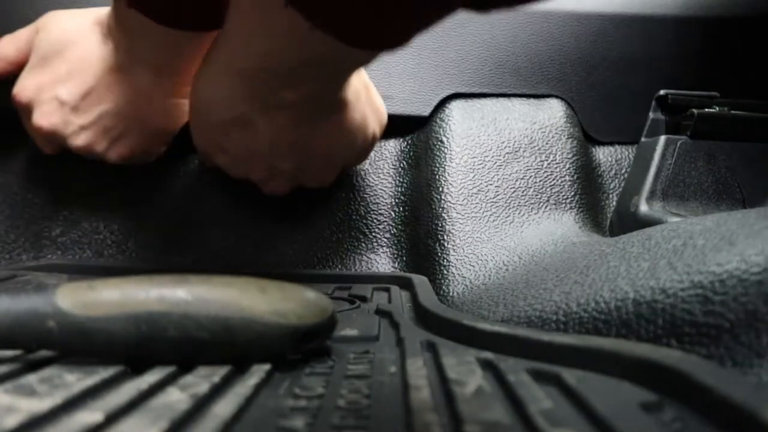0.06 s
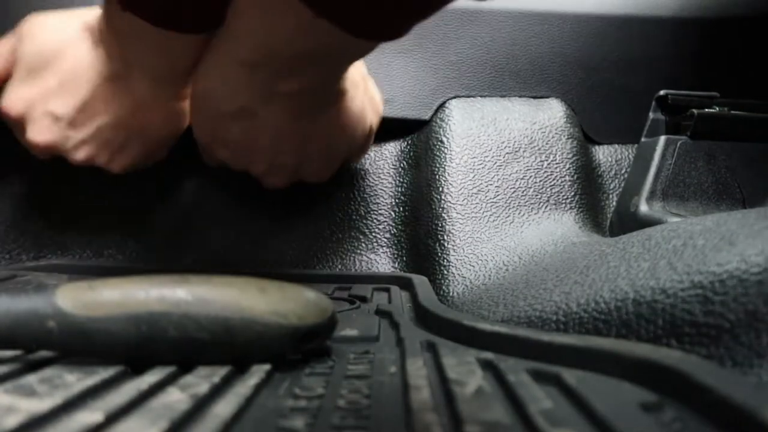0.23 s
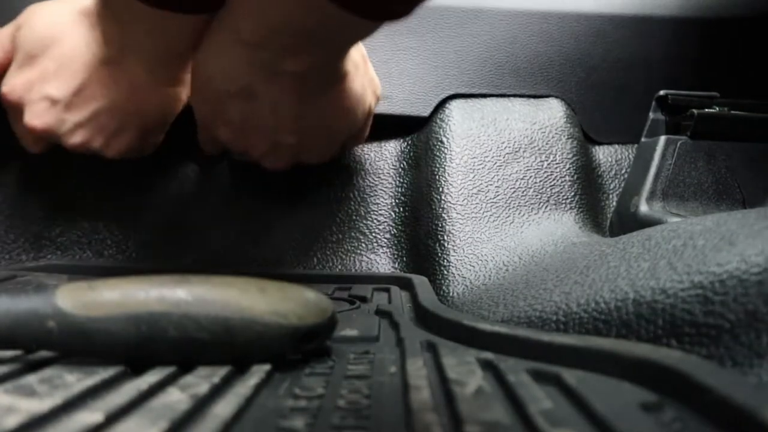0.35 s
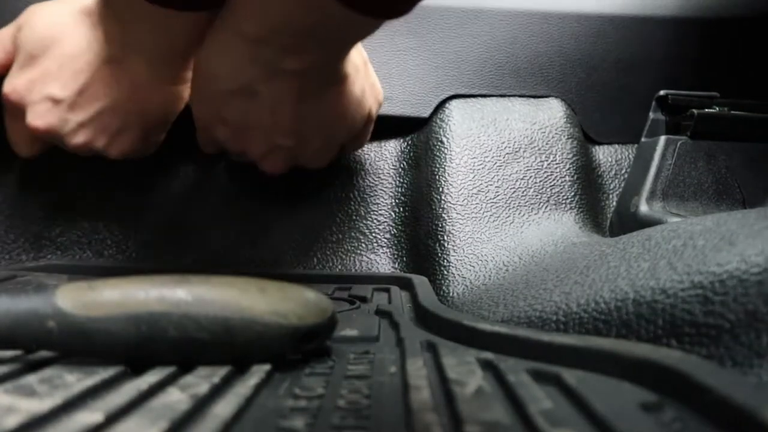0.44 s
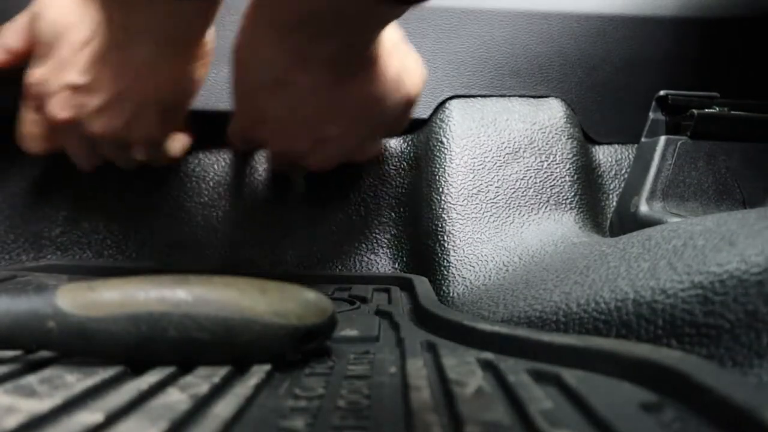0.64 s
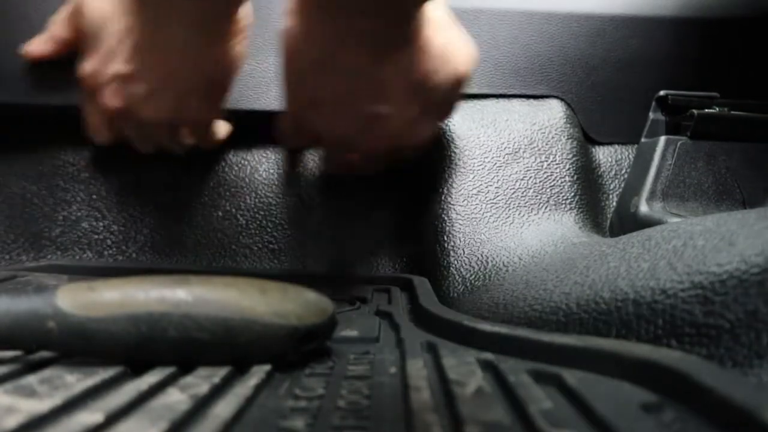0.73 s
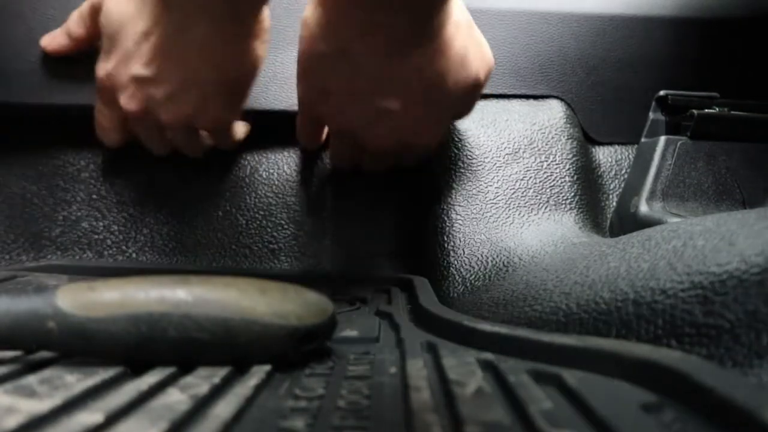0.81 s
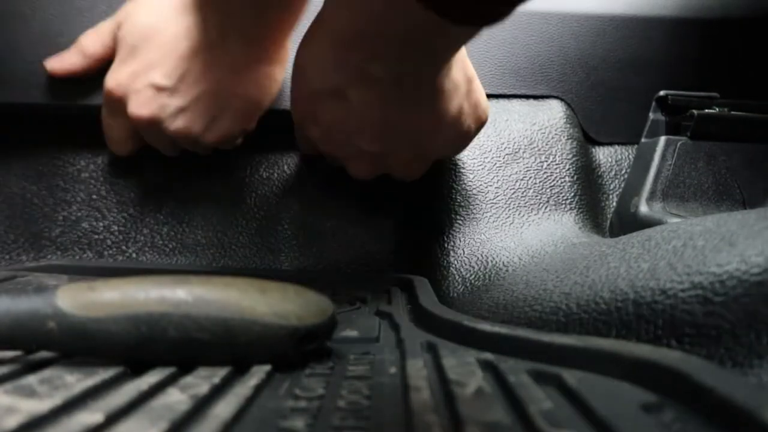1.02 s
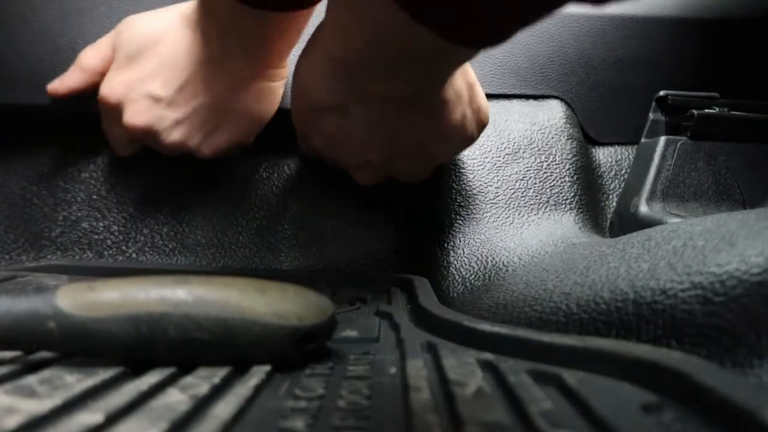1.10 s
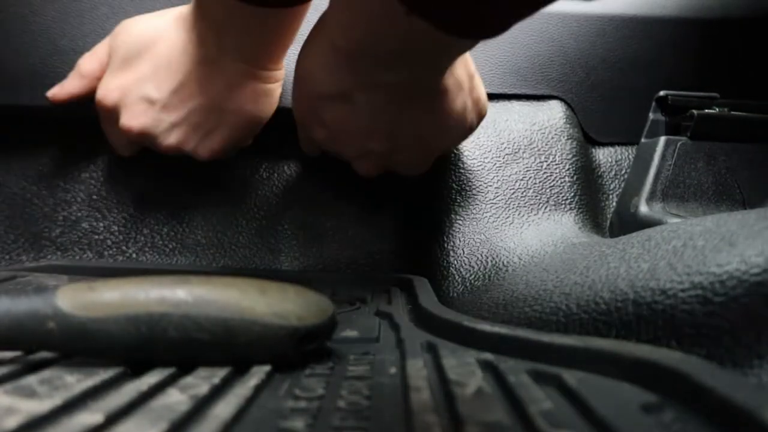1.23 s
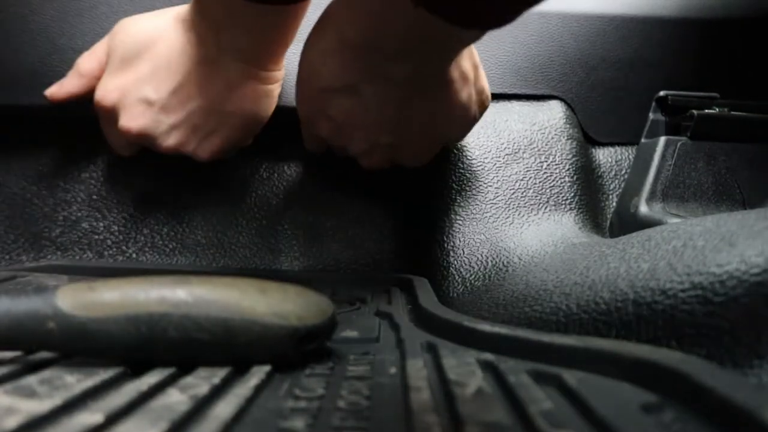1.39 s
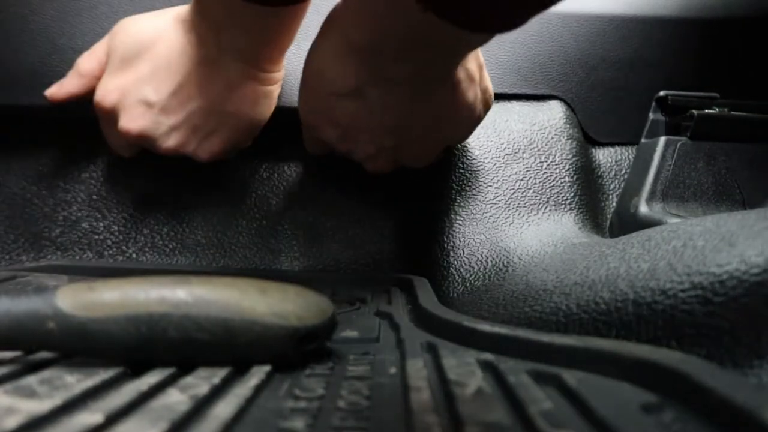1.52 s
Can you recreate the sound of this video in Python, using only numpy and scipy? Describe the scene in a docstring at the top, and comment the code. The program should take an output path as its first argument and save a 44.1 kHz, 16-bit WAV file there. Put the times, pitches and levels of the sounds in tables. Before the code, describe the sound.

A plastic clip snaps loose with one loud crack as hands pry at a trim panel. Much softer knocks, clicks, rubbing and faint squeaks follow, heard close up inside a quiet vehicle cab.

```python
"""A push-pin clip snaps loose as a plastic trim panel is pried off by hand in a vehicle cab, close-miked.
The snap is a crack of resonant noise, ringing panel modes, a deep push of air and a shaking cab; it overloads.
The panel chatters and fingers knock on it: short scuffs of resonant noise that die away as thuds and clicks.
Strained plastic squeaks in gliding harmonics, and hands and sleeves slide as strokes of grainy noise.
A hand leans on the panel with one deep decaying sine, over the low noise of the quiet cab."""
import sys
import numpy as np
from scipy import signal
from scipy.fft import rfft, irfft
from scipy.io import wavfile
from scipy.ndimage import uniform_filter1d

SR = 44100
rng = np.random.default_rng(int(sys.argv[2]) if len(sys.argv) > 2 else 0)


def generate_wav(signal):
    """Clip the signal to [-1, 1] and save it as 16-bit WAV at the path in sys.argv[1]."""
    frames = np.transpose(np.atleast_2d(signal))
    scaled = np.clip(frames, -1, 1) * 32767
    pcm = np.round(scaled).astype(np.int16)
    wavfile.write(sys.argv[1], SR, pcm)


N = 68355  # length in samples

# quiet cab noise, relative spectrum: pitch_hz [Hz], density_db [dB per Hz]
FLOOR_SPECTRUM = [(25, -9), (60, 1), (200, -6), (400, -15), (800, -22), (1350, -18), (2000, -28),
                  (4000, -35), (15000, -45.5)]
# hand and sleeve strokes: start_s [s], peak_s [s], end_s [s], rub_db [dB before grain], hiss_db [dB before grain]
SLIDE_STROKES = [(-.1, 0.038, 0.073, -57, -66), (0.027, 0.097, 0.28, -58, -72),
                 (0.257, 0.367, 0.4, -53.5, -76.5), (0.505, 0.624, 0.78, -53.5, -60),
                 (0.656, 0.744, .83, -47.5, -55), (.72, .83, 0.99, -60.5, -72.5),
                 (0.882, 0.97, 1.08, -60, -63), (0.998, 1.067, 1.288, -60, -71),
                 (1.143, 1.276, 1.365, -59, -74.5), (1.384, 1.408, 1.44, -63.5, -75),
                 (1.44, 1.52, 1.54, -58.5, -73)]
# rubbing on plastic, relative spectrum before softening: pitch_hz [Hz], density_db [dB per Hz]
RUB_SPECTRUM = [(59, -42.5), (100, -12.5), (558, -1), (674, -9.5), (904, -5), (1560, -9), (2320, -10.5),
                (2750, -12), (5480, -16), (15000, -31.5)]
# hiss of the strokes, relative spectrum: pitch_hz [Hz], density_db [dB per Hz]
HISS_SPECTRUM = [(1500, -11.5), (3500, 1.5), (6000, 0.5), (8500, -5.5), (11000, -8), (15000, -7)]
# squeaks of strained plastic and fingertips:
# start_s [s], length_s [s], pitch_hz [Hz, before glide and waver], level_db [dB], overtone_db [dB per overtone]
SQUEAK_EVENTS = [(.02, 0.04, 2645, -57, -9), (0.86, 0.06, 1430, -59, -18), (1.047, 0.034, 1334, -59, -9.5)]
# knocks and chatters of the panel: start_s [s], contact_s [s], thud_db [dB before body band],
# knock_db [dB before body band], knock_hz [Hz], click_db [dB], tick_db [dB]
KNOCK_EVENTS = [(0.099, 0.0013, -41.5, -40, 780, -64, -94), (0.106, 0.0013, -42.5, -43.5, 696, -63.5, -76),
                (0.136, 0.0026, -40, -57, 650, -80, -81), (0.167, 0.025, -55, -56.5, 509, -85, -73),
                (.194, 0.012, -36.5, -54, 600, -54.5, -63), (.298, 0.0013, -53.5, -91, 892, -52, -56),
                (.335, .010, -46, -37, 980, -47.5, -53.5), (.362, 0.0053, -40.5, -42.5, 578, -53, -61),
                (0.5157, .002, -52.5, -42, 503, -63, -81.5), (.564, 0.0029, -39.5, -43, 850, -38, -48),
                (0.592, 0.017, -49, -47.5, 603, -61, -77), (0.657, 0.00099, -49.5, -44.5, 633, -56.5, -50),
                (0.7522, 0.0016, -33.5, -31, 460, -47, -51), (0.846, 0.0067, -56, -47, 557, -65.5, -78),
                (1.024, 0.012, -59, -50, 558, -65.5, -73.5), (1.1944, 0.0012, -37, -37, 1060, -42.5, -49.5),
                (1.26, 0.0085, -45, -49.5, 494, -60, -69.5), (1.292, 0.0013, -50, -34.5, 574, -47.5, -56),
                (1.358, 0.0027, -53.5, -48, 594, -60.5, -89), (1.459, .001, -80, -59.5, 1714, -58, -76),
                (1.474, 0.0083, -61, -56, 521, -62, -79), (1.516, 0.0069, -68, -57, 1343, -58.5, -73)]
# crack of the pin and its tail in the cab, levels before CRACK_DB:
# pitch_hz [Hz], crack_db [dB], crack_t60_s [s], tail_db [dB], tail_t60_s [s]
CRACK_BANDS = [(62.5, -23, 0.022, -45.5, 0.17), (216, -16.5, 0.039, -45.5, 0.68),
               (638.8, -9.5, 0.026, -43, 0.13), (1560, -6, 0.04, -42, 0.12), (3020, -5, 0.02, -41.5, 0.15),
               (6100, -8.5, .031, -42.5, 0.051), (14000, -25, 0.021, -47.5, .075)]
# ringing panel modes: pitch_hz [Hz], level_db [dB before RING_DB]
PANEL_MODES = [(120, -26.5), (226, -9), (297, -3.5), (472, -1.5), (560, -7.5), (655, -3), (875, -9.5),
               (1012, -6.5), (1090, -6.5), (1303, -3), (1697, -11), (1980, -7), (2160, -3), (2510, -1.5)]
# cab body modes: pitch_hz [Hz], level_db [dB before SHAKE_DB], t60_s [s]
SHAKE_MODES = [(54, -10, 0.57), (72, -11.5, .4), (97.4, -2.5, .42)]

FLOOR_DB = -61.5
RUB_SOFT_HZ, GRAIN_DB, GRAIN_PER_S = 2500, 2, 490
SQUEAK_GLIDE, SQUEAK_WAVER, WAVER_PER_S = 0.06, 0.065, 1300  # glide and waver are shares of the pitch
BUMP_S, BUMP_HZ, BUMP_T60_S, BUMP_DB = 1.4, 56.4, 0.059, -43.5

THUD_HZ, THUD_WIDTH_HZ, THUD_T60_S = 230, 180, 0.062
CLICK_HZ, CLICK_WIDTH_HZ, CLICK_T60_S = 2600, 710, 0.013
TICK_HZ, TICK_WIDTH_HZ, TICK_T60_S = 5000, 3500, 0.0057
KNOCK_SHARE, KNOCK_CYCLES = 0.25, 22  # width as a share of the pitch; periods until a knock has died away
CLACK_HZ, CLACK_WIDTH_HZ, CLACK_DB = 850, 530, -6  # broad clack around each knock, dB relative to it
CAB_T60_S, CAB_DB = 0.16, -30  # slower tail under each contact
BODY_ATTACK_S, CLICK_ATTACK_S = 0.0011, 0.00023
BODY_LOW_HZ, BODY_HIGH_HZ = 111, 2350  # range in which a light contact moves the panel

SNAP_S, RING_DB, CRACK_DB, SHAKE_DB = 0.2049, 6, 8, -28.5
RING_BUILD_S, CRACK_BUILD_S = 0.0017, 0.0002
PANEL_T60_S, PANEL_REF_HZ, PANEL_DAMPING = 0.062, 300, 0.3  # t60 at the reference pitch; exponent of its fall
PUSH_HZ, PUSH_T60_S, PUSH_DB = 46, 0.02, -4  # air shoved by the jumping panel
FULL_SCALE, TOP_HZ = 0.98, 15500  # clipping level; upper edge of the recorder


def undb(db):
    """Decibels to gain."""
    return 10 ** (np.asarray(db) / 20)


def unit(x):
    """Scale to rms 1."""
    return x / np.sqrt(np.mean(x ** 2))


def since(at):
    """Seconds since a moment, zero before it."""
    return np.maximum(np.arange(N) / SR - at, 0)


def fade(t, t60):
    """Exponential decay, falling 60 dB in t60 seconds."""
    return np.exp(-np.log(1000) * t / t60)


def rise(t, attack):
    """Exponential attack."""
    return 1 - np.exp(-t / attack)


def shaped(gain):
    """Noise of rms 1 with a gain for every frequency."""
    freqs = np.arange(N // 2 + 1) * SR / N + 1e-3  # offset avoids zero
    spectrum = rfft(rng.standard_normal(N))
    return unit(irfft(spectrum * gain(freqs), N))


def coloured(points):
    """Noise with a spectrum of (Hz, dB) points, joined on a logarithmic pitch scale."""
    hz, db = np.array(points).T
    return shaped(lambda f: undb(np.interp(np.log(f), np.log(hz), db)))


def resonant(hz, width):
    """Noise in a steep resonance, its slow swells evened out so that each blow keeps its strength."""
    x = shaped(lambda f: 1 / (1 + ((f * f - hz * hz) / (f * width)) ** 2))
    power = np.abs(signal.hilbert(x)) ** 2
    swells = uniform_filter1d(power, size=int(SR / width) + 1)
    return unit(x / np.sqrt(swells))


def modes(table, t):
    """Decaying sines, each slightly off its pitch."""
    out = 0
    for hz, db, t60 in table:
        detuned_hz = hz * (1 + 0.002 * rng.standard_normal())
        out = out + undb(db) * fade(t, t60) * np.sin(2 * np.pi * detuned_hz * t)
    return out


def wobble(rate):
    """Random values, rate per second, joined by lines and spread near 1."""
    return np.interp(np.arange(N) * rate / SR, np.arange(N), rng.standard_normal(N))


def quiet_cab():
    """Steady low-heavy noise of the cab."""
    return undb(FLOOR_DB) * coloured(FLOOR_SPECTRUM)


def slides():
    """Skin and cloth rub over the grained plastic in strokes that swell and fade."""
    t, out = np.arange(N) / SR, 0
    soften = signal.butter(1, RUB_SOFT_HZ, fs=SR, output="sos")
    rub = unit(signal.sosfilt(soften, coloured(RUB_SPECTRUM)))
    hiss = coloured(HISS_SPECTRUM)
    for start, peak, end, rub_db, hiss_db in SLIDE_STROKES:
        ramp = np.interp(t, [start, peak, end], [0, 1, 0])
        stroke = np.sin(np.pi / 2 * ramp) ** 2
        out = out + stroke * (undb(rub_db) * rub + undb(hiss_db) * hiss)
    grain = undb(GRAIN_DB * wobble(GRAIN_PER_S))
    return out * grain


def bump():
    """A hand leans on the panel: a soft, deep bump as the grip settles."""
    return modes([(BUMP_HZ, BUMP_DB, BUMP_T60_S)], since(BUMP_S))


def squeaks():
    """Plastic sticks and slips at a high, unsteady rate that rises a little."""
    out = 0
    for start, length, hz, db, overtone_db in SQUEAK_EVENTS:
        progress = np.minimum(since(start) / length, 1)
        swell = np.sqrt(4 * progress * (1 - progress))
        bend = SQUEAK_GLIDE * (progress - 0.5) + SQUEAK_WAVER * wobble(WAVER_PER_S)
        phase = 2 * np.pi * np.cumsum(hz * (1 + bend)) / SR
        harmonics = sum(undb(overtone_db * k) * np.sin((k + 1) * phase) for k in range(5))
        out = out + undb(db) * swell * harmonics
    return out


def knocks():
    """Each contact scuffs briefly, then dies away as a dull thud and hollow knock under a quicker, bright click."""
    body, bright = np.zeros(N), np.zeros(N)
    thud, clack = resonant(THUD_HZ, THUD_WIDTH_HZ), resonant(CLACK_HZ, CLACK_WIDTH_HZ)
    click, tick = resonant(CLICK_HZ, CLICK_WIDTH_HZ), resonant(TICK_HZ, TICK_WIDTH_HZ)
    for start, contact, thud_db, knock_db, hz, click_db, tick_db in KNOCK_EVENTS:
        t, after = since(start), since(start + contact)
        cab_tail = undb(CAB_DB) * fade(after, CAB_T60_S)
        knock = resonant(hz, KNOCK_SHARE * hz) + undb(CLACK_DB) * clack
        # full strength lasts while the contact lasts
        low = undb(thud_db) * thud * (fade(after, THUD_T60_S) + cab_tail)
        low = low + undb(knock_db) * knock * (fade(after, KNOCK_CYCLES / hz) + cab_tail)
        high = undb(click_db) * click * (fade(after, CLICK_T60_S) + cab_tail)
        high = high + undb(tick_db) * tick * (fade(after, TICK_T60_S) + cab_tail)
        body += rise(t, BODY_ATTACK_S) * low
        bright += rise(t, CLICK_ATTACK_S) * high
    body_band = signal.butter(2, [BODY_LOW_HZ, BODY_HIGH_HZ], "band", fs=SR, output="sos")
    return bright + signal.sosfilt(body_band, body)


def pin_crack(t):
    """The pin cracks out of its hole: bands of resonant noise, each with a short tail in the cab."""
    columns = np.array(CRACK_BANDS).T
    crack = 0
    for hz in np.geomspace(60, 14000, 13):
        db, t60, tail_db, tail_t60 = (np.interp(np.log(hz), np.log(columns[0]), col) for col in columns[1:])
        decay = undb(db) * fade(t, t60) + undb(tail_db) * fade(t, tail_t60)
        crack = crack + resonant(hz, hz / 2) * decay
    return undb(CRACK_DB) * crack * rise(t, CRACK_BUILD_S)


def panel_ring(t):
    """The freed panel rings in its modes; the higher ones die sooner."""
    damped = [(hz, db, PANEL_T60_S * (PANEL_REF_HZ / hz) ** PANEL_DAMPING) for hz, db in PANEL_MODES]
    return undb(RING_DB) * modes(damped, t) * rise(t, RING_BUILD_S)


def snap():
    """The pin cracks out, the panel jumps and rings, and the cab body shakes."""
    t = since(SNAP_S)
    push = modes([(PUSH_HZ, PUSH_DB, PUSH_T60_S)], t)
    shake = undb(SHAKE_DB) * modes(SHAKE_MODES, t)
    return pin_crack(t) + panel_ring(t) - push + shake


def scene():
    """All the sounds over the quiet cab."""
    return (quiet_cab() + slides() + bump() + squeaks() + knocks() + snap())[None]


def record(dry):
    """The recorder clips the peaks flat, then cuts the top."""
    clipped = np.clip(dry, -FULL_SCALE, FULL_SCALE)
    top_cut = signal.ellip(8, 0.2, 60, TOP_HZ, fs=SR, output="sos")  # 0.2 dB ripple, 60 dB rejection
    return signal.sosfilt(top_cut, clipped)


dry = scene()
out = record(dry)
generate_wav(out)
```